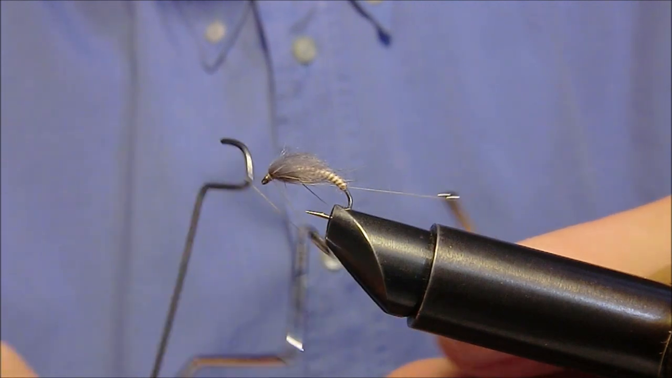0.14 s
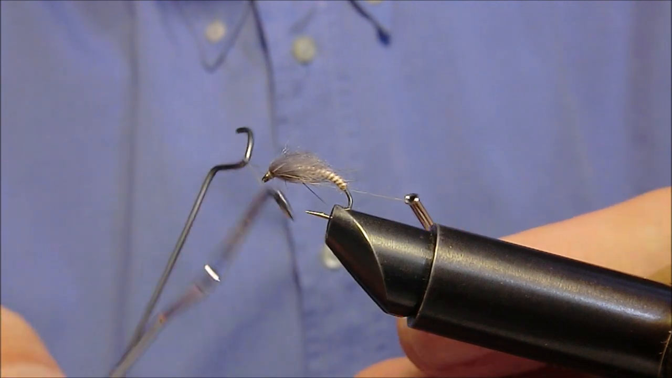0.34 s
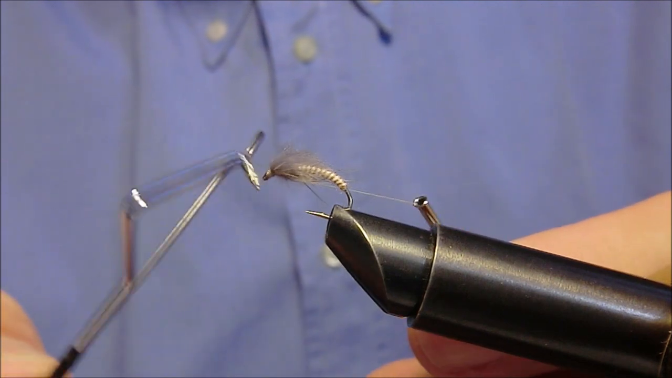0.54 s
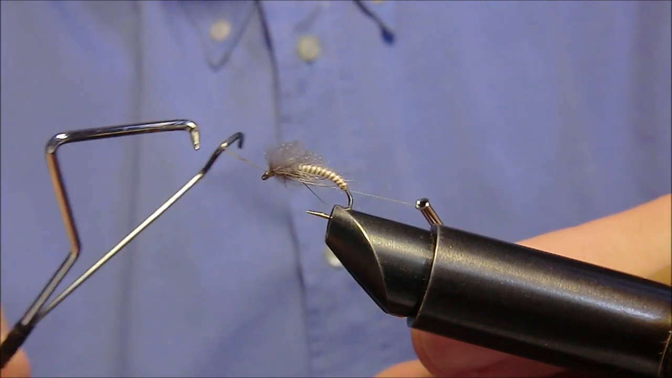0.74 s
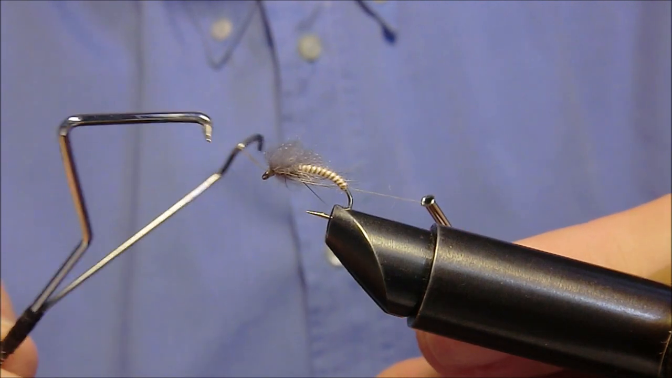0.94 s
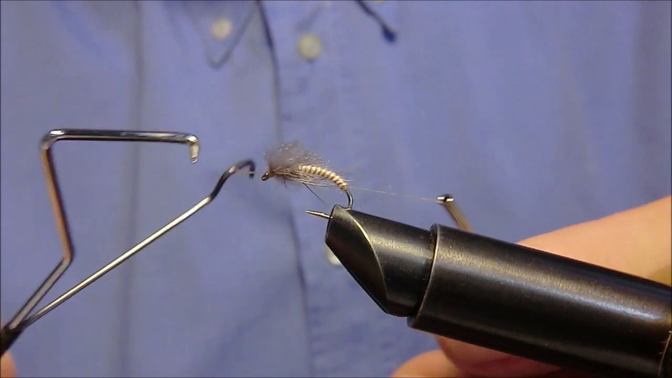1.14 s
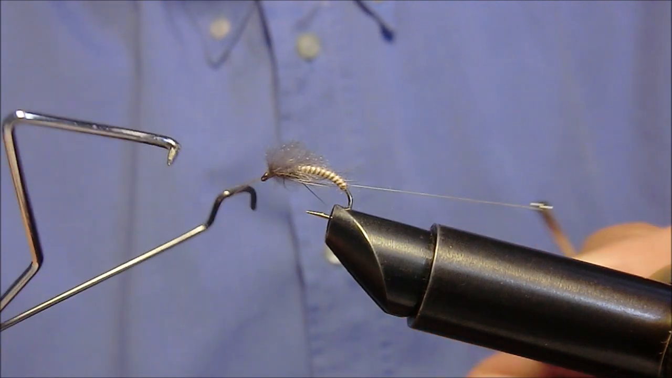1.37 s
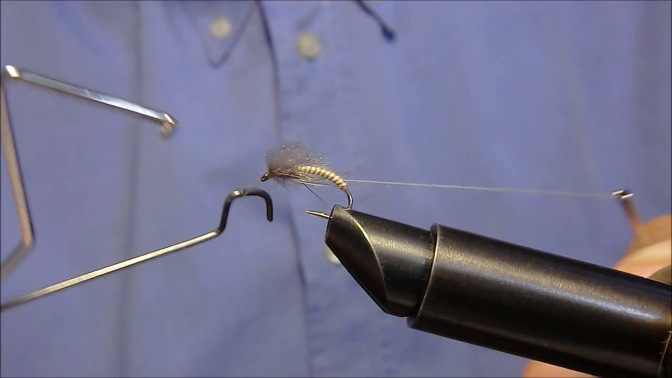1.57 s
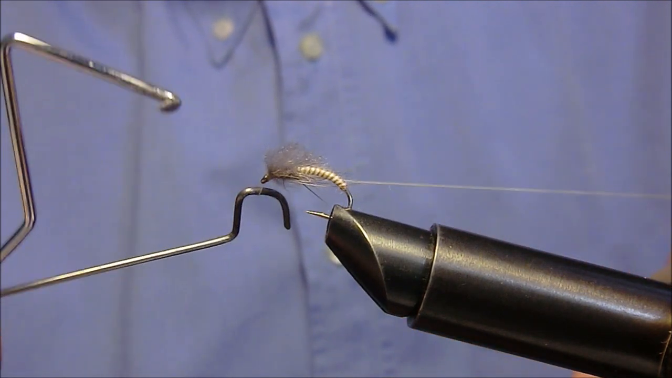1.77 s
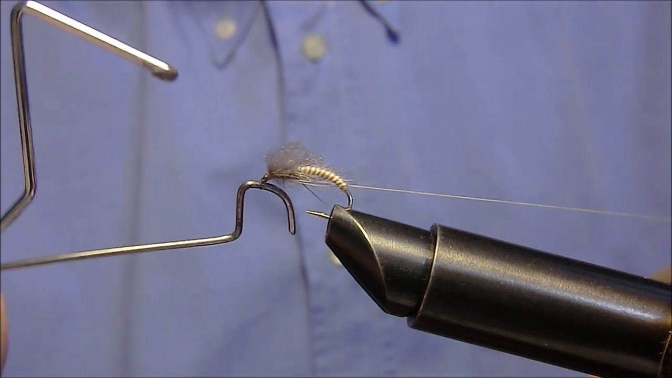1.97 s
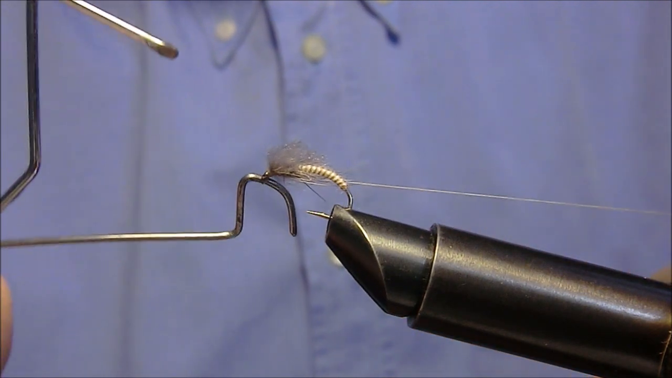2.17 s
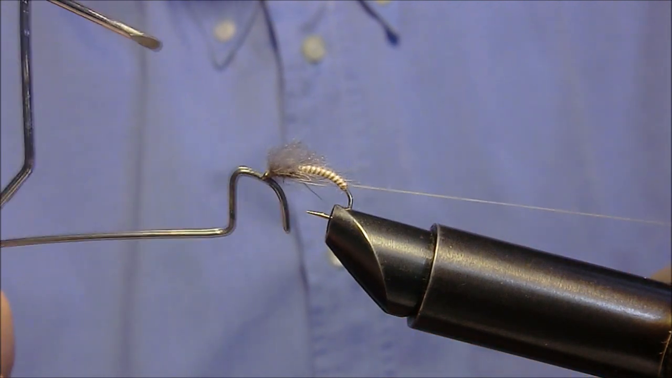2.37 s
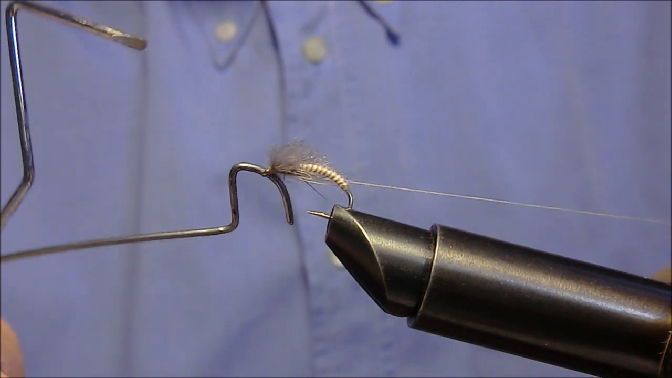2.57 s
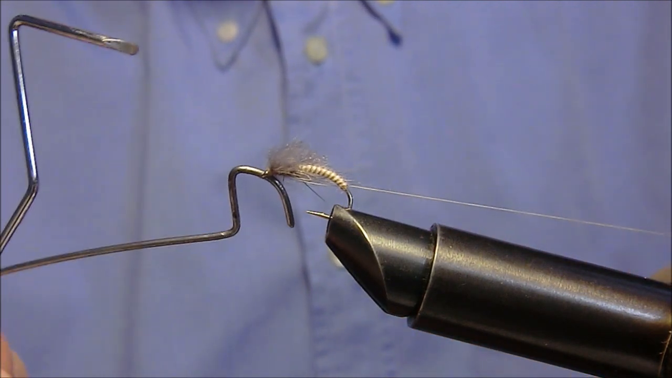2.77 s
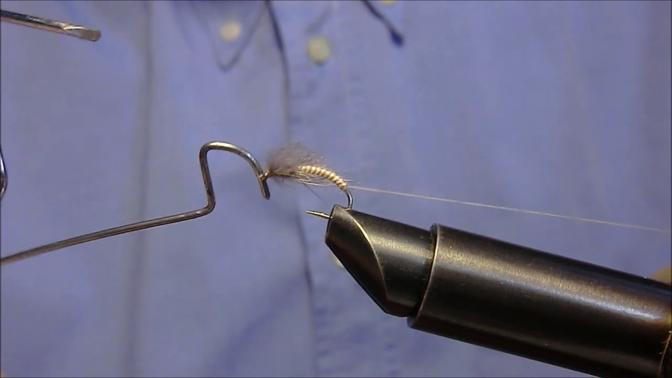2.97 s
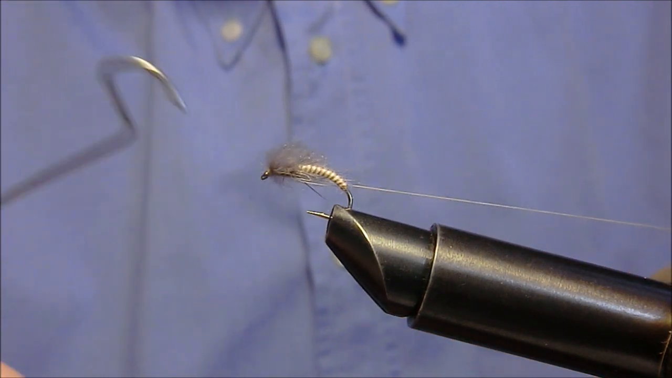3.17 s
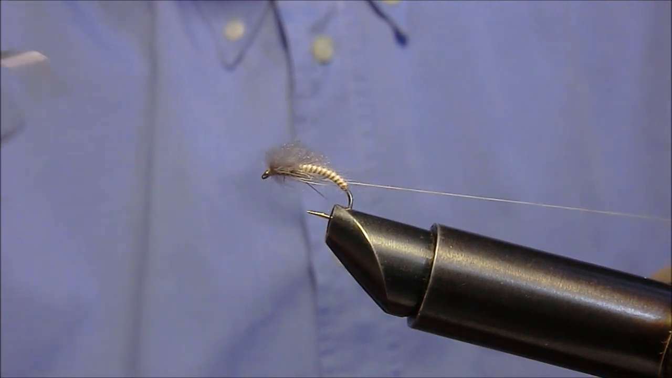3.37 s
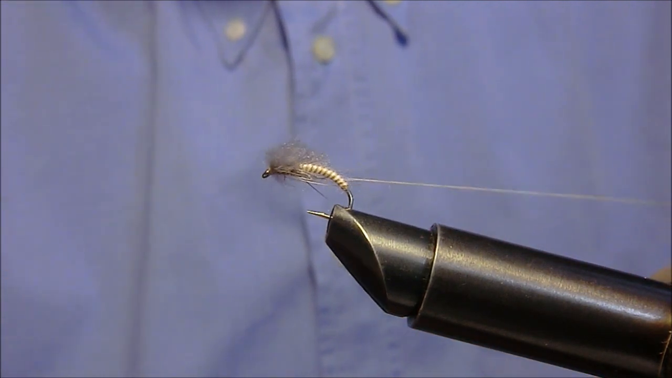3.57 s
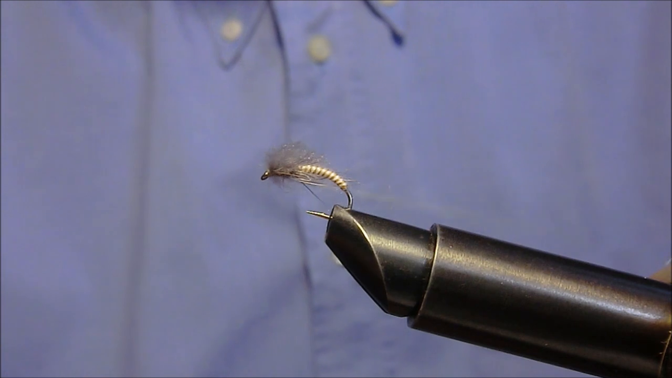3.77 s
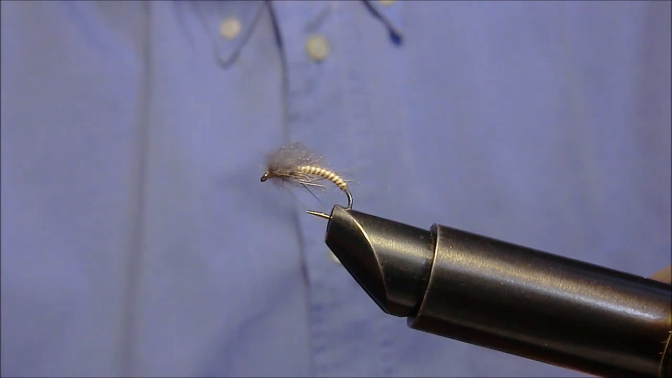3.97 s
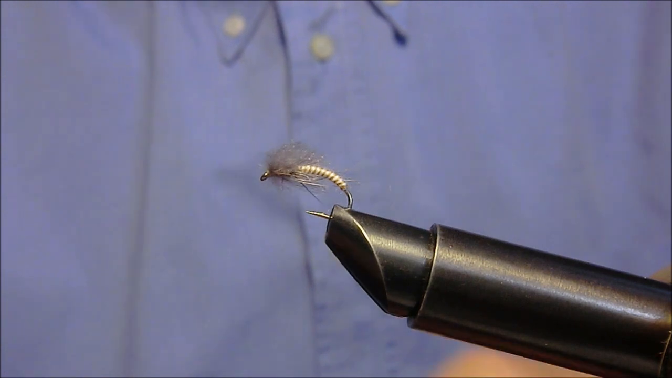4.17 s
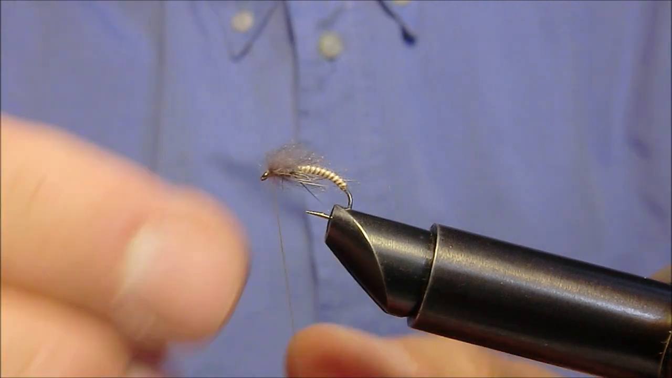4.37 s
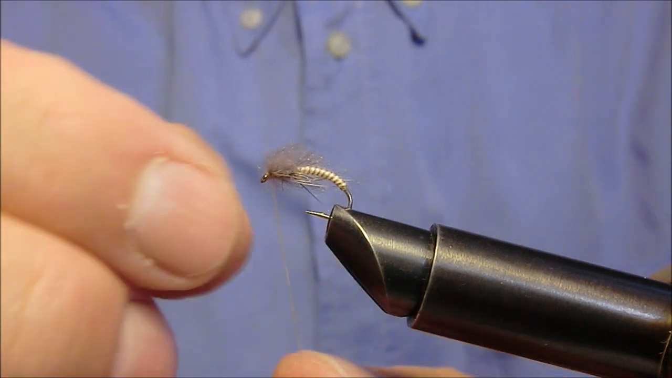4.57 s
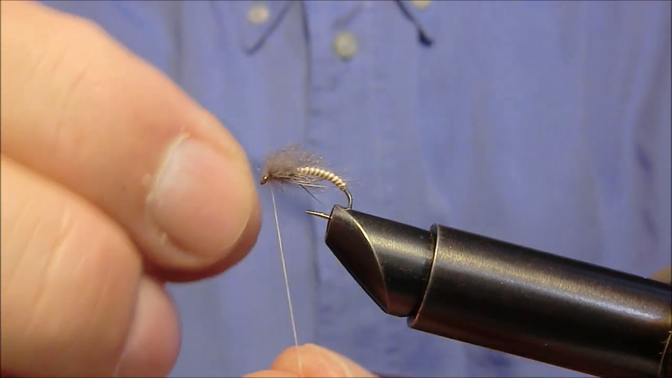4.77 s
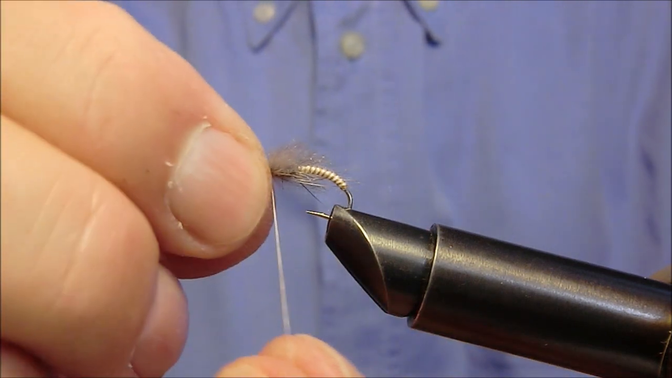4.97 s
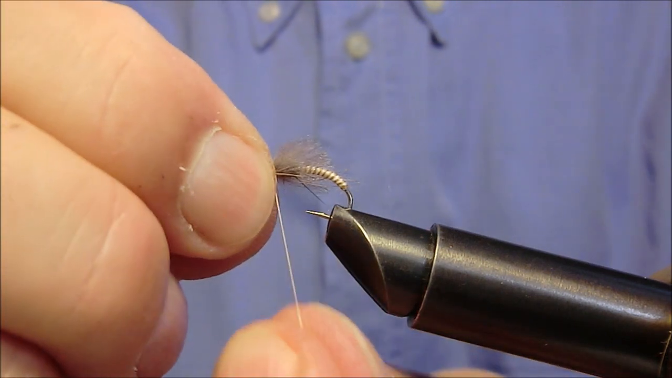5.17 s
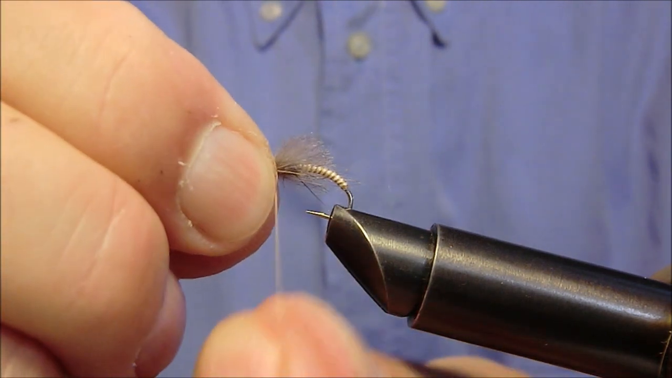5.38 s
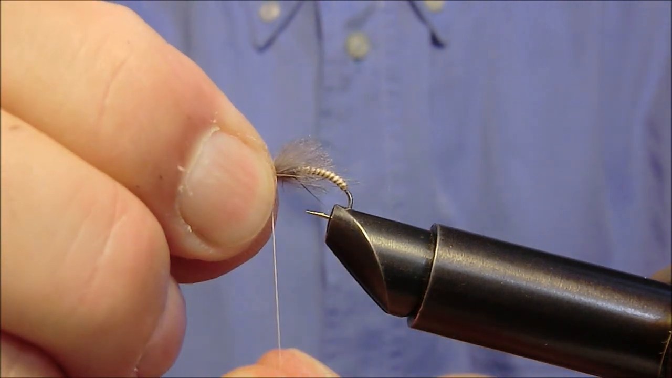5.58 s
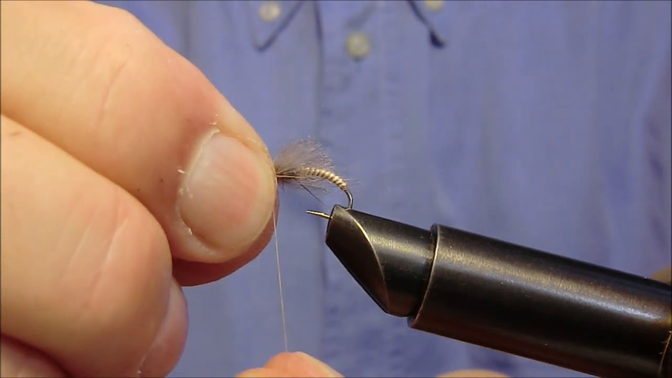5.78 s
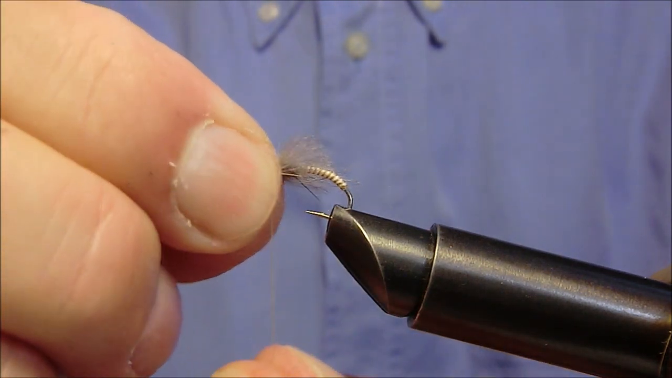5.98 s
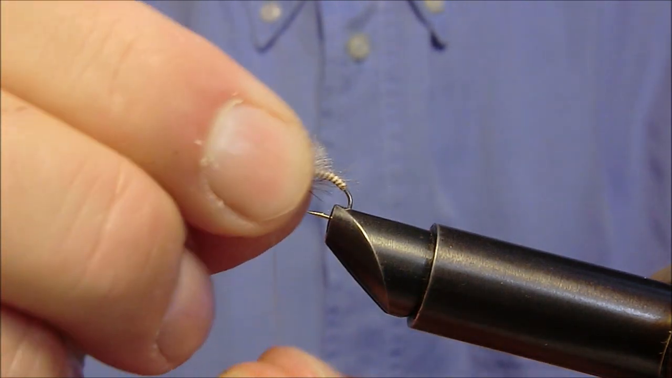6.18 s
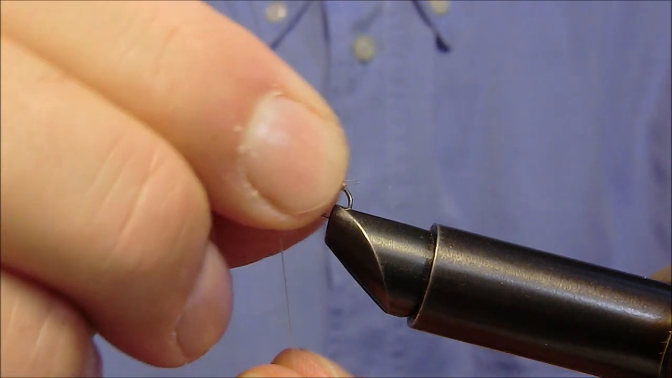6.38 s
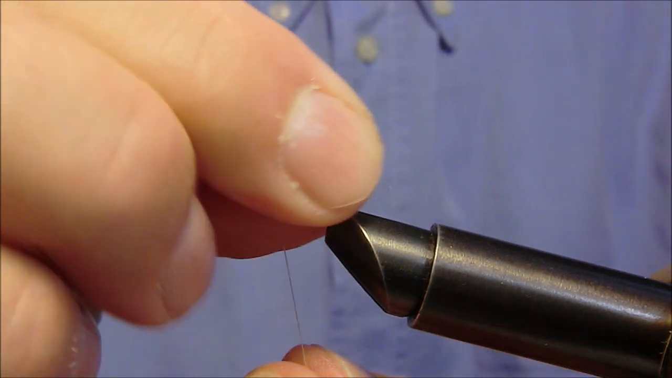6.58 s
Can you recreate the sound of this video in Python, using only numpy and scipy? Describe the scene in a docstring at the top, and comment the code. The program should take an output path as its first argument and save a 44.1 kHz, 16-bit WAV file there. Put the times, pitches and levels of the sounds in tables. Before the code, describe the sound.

A quiet small room with low rumble, soft hiss and a barely perceptible hum, heard by one close microphone, the same in both channels. At about 0.1 s a thin wire clicks lightly, followed near 0.2 s by a very faint wavering squeak of thread. At 0.62 s a steel tool clinks brightly, with a weaker touch just after and a slender ring. Another almost buried squeak comes at 1.75 s. Tiny contacts at the hook follow at 2.3 and 2.45 s, a clearer dry tap at 2.9 s and a faint pair near 3.2 s. At 3.99 s a small click leads into a very loud, hard scissor snip at 4.05 s, with a second bright clack at 4.12 s and a short room tail. The background drops, then creeps back over a couple of seconds, with faint ticks at 4.85 and 5.15 s; then only room noise until 6.7 s.

```python
"""Fly tying at a bench

In a small room a wire whip finisher clicks, clinks and slips off the hook in the vise; the bobbin
squeaks faintly as thread is drawn; scissors snip close to the microphone. Steel is noise cracks plus
decaying sine modes, the squeak an unsteady harmonic tone, the background filtered noise with two tones.
The snip makes the gain control duck, and the room hiss creeps back."""
import sys
import numpy as np
from scipy import signal
from scipy.fft import rfft, irfft, next_fast_len
from scipy.io import wavfile
from scipy.ndimage import uniform_filter1d, map_coordinates

SR = 44100
rng = np.random.default_rng(int(sys.argv[2]) if len(sys.argv) > 2 else 0)


def unload_audio(sound):
    """Save the sound as a 16-bit wav file, at the path given as the first command line argument."""
    columns = np.transpose(np.atleast_2d(sound))
    # keep every value between -1 and 1, then stretch to whole-number steps
    steps = np.round(np.clip(columns, -1, 1) * 32767)
    wavfile.write(sys.argv[1], SR, steps.astype(np.int16))


N = 292074  # samples


# scissor contacts: start_s, ring_db, crack_db
SCISSOR_HITS = [(3.9874, -34, -29.5), (4.0495, 6.5, 2), (4.0576, -27, -15), (4.0591, -6, 1),
                (4.0604, -3.5, -7), (4.0650, -1.5, -5.5), (4.0907, -25, -15), (4.1143, -36, -15.5),
                (4.1155, -6.5, -17), (4.1223, -5, -14.5)]
# blade modes: freq_hz, level_db, t60_s
SCISSOR_MODES = [(601, -37, 0.11), (700, -31.5, .06), (1118, -25, 0.032), (1900, -18.5, 0.018),
                 (2740, -18, 0.019), (5800, -17, 0.0084), (7320, -10, 0.0164), (7600, -5, 0.0093),
                 (8320, -10, 0.0085), (10920, -26, 0.017), (13600, -23.5, .006)]
# crack filter: freq_hz, gain_db
SCISSOR_CRACK = [(60, -19), (170, -6), (260, -14.5), (480, -9), (680, 4), (1300, -8.5), (2400, -2.5),
                 (3800, -3.5), (6000, -2), (8000, 4), (10000, -1.5), (14000, -15.5), (16000, -19)]


def scissors():
    """Blades strike and snip: hard cracks excite the short modes of the steel."""
    return steel(SCISSOR_HITS, SCISSOR_MODES, SCISSOR_CRACK, crack_t60_s=0.011, wet_db=-4.5)


# finisher contacts: start_s, ring_db, crack_db
FINISHER_HITS = [(.6170, -21.5, -14), (.6375, -32, -44), (.6522, -19, -31)]
# finisher modes: freq_hz, level_db, t60_s
FINISHER_MODES = [(725, -23, 0.033), (1760, -23, 0.017), (2525, -12, 0.06), (2660, -31, .14),
                  (3440, -12, 0.022), (4500, -15, 0.018), (5500, -8, 0.019), (6160, -10, 0.041),
                  (6270, -15, 0.021), (9500, -36, .07), (15200, -28, 0.057)]
# crack filter: freq_hz, gain_db
FINISHER_CRACK = [(120, -37), (200, 0), (1020, -12), (1680, 4.5), (2470, 5.5), (2910, 2), (6050, 1.5),
                  (11100, -15), (13600, -19), (15100, -25), (16000, -53)]


def finisher():
    """The whip finisher clinks: cracks plus the decaying modes of its steel."""
    return steel(FINISHER_HITS, FINISHER_MODES, FINISHER_CRACK, crack_t60_s=0.013, wet_db=-5.5)


# wire contacts: start_s, ring_db, crack_db
WIRE_HITS = [(.0575, -59, -37), (.0932, -43, -31), (.1059, -15.5, -17.5)]
# wire modes: freq_hz, level_db, t60_s
WIRE_MODES = [(737, -35.5, 0.39), (3000, -13.5, 0.023), (4900, -26, 0.0074), (5440, -24, .016),
              (8400, -5, 0.0058), (9280, -9, 0.0093), (13440, -13, 0.0038)]
# crack filter: freq_hz, gain_db
WIRE_CRACK = [(120, -45), (200, -7), (1910, -13.5), (2910, 0), (3900, -11), (4900, -3.5), (6170, -18),
              (8580, -5), (11500, -14), (13100, -6), (16000, -25)]


def wire():
    """The wire clicks: short high modes over one long low mode."""
    return steel(WIRE_HITS, WIRE_MODES, WIRE_CRACK, crack_t60_s=0.016, wet_db=-3.5)


# hook contacts: start_s, ring_db, crack_db
HOOK_HITS = [(2.3118, -50, -48), (2.4648, -31.5, -41.5), (2.8786, -23.5, -27.5), (3.1672, -58, -34.5),
             (3.1688, -31, -34), (3.2088, -46, -29.5), (3.2130, -33, -31.5)]
# hook modes: freq_hz, level_db, t60_s
HOOK_MODES = [(3720, -16.5, 0.012), (5380, -10.5, 0.0091), (5900, -12, 0.018), (7800, -22.5, 0.0065),
              (9580, -11.5, 0.019)]
# crack filter: freq_hz, gain_db
HOOK_CRACK = [(180, -35.5), (300, 0.5), (1010, -4), (1810, 1), (2480, -4), (5340, 7), (6520, 0),
              (9710, -6.5), (16000, -67)]


def hook():
    """Contacts at the hook: cracks plus high modes that die within 20 ms."""
    return steel(HOOK_HITS, HOOK_MODES, HOOK_CRACK, crack_t60_s=0.014, wet_db=-7.0)


def steel(hits, modes, crack_colour, crack_t60_s, wet_db):
    """Every contact cracks and sets the part's modes ringing; the crack carries further into the room."""
    rings, cracks = np.zeros(N), np.zeros(N)
    for start_s, ring_db, crack_db in hits:
        add(rings, start_s, amp(ring_db) * ring(modes))
        add(cracks, start_s, amp(crack_db) * crack(crack_t60_s))
    cracks = coloured(cracks, crack_colour)
    room_feed = cracks + 0.5 * rings
    return rings + cracks + amp(wet_db) * room(room_feed)


def ring(modes):
    """The modes of one blow, each at a slightly new strength."""
    t = np.arange(SR // 2) / SR
    out = np.zeros(len(t))
    for freq_hz, level_db, t60_s in modes:
        strength = amp(level_db + rng.uniform(-1.47, 1))
        out += strength * fade(t, t60_s) * np.sin(2 * np.pi * freq_hz * t)
    return out


def crack(t60_s):
    """The dense, quickly dying vibration of a hard contact: decaying noise of set energy."""
    envelope = fade(np.arange(SR // 20) / SR, t60_s)
    burst = envelope * rng.standard_normal(len(envelope))
    return burst * np.linalg.norm(envelope) / np.linalg.norm(burst)


# long thin rings after a clink or snip: start_s, freq_hz, level_db, t60_s
LONG_RINGS = [(.617, 2474, -33.5, 0.35), (.617, 2990, -48, 0.26), (0.652, 6080, -49, .3),
              (.6522, 6270, -46, 0.3), (3.212, 5440, -53, 0.22), (3.213, 5530, -49, 0.18),
              (4.1155, 10900, -35, 0.2), (4.1155, 12800, -43, .17)]


def long_rings():
    """Single high tones that ring on after the contacts."""
    out = np.zeros(N)
    for start_s, freq_hz, level_db, t60_s in LONG_RINGS:
        add(out, start_s, ring([(freq_hz, level_db, t60_s)]))
    return out


# knocks reaching the vise stem: start_s, level_db
VISE_KNOCKS = [(.106, -46.5), (0.616, -45.5), (2.881, -37), (3.214, -48.5), (4.06, -43)]
# stem modes: freq_hz, level_db, t60_s
VISE_MODES = [(91, -3.5, 0.23), (168, -19, 0.17), (282.5, -4, 0.27), (342, -9.5, 0.17), (747, -8.5, 0.091),
              (898, -14, 0.062)]


def vise():
    """The heavy stem hums briefly after a knock."""
    out = np.zeros(N)
    for start_s, level_db in VISE_KNOCKS:
        add(out, start_s, amp(level_db) * ring(VISE_MODES))
    return out


# dull bumps of the hand working the scissors: start_s, level_db
BUMPS = [(3.9877, -32), (4.1205, -45)]
BUMP_HZ, BUMP_T60_S = 200, 0.017


def bumps():
    """A soft, low push that dies within a few cycles."""
    out = np.zeros(N)
    for start_s, level_db in BUMPS:
        add(out, start_s, ring([(BUMP_HZ, level_db, BUMP_T60_S)]))
    return out


# light ticks of thread and fingernail: start_s, level_db, pitch_hz
TICKS = [(4.8417, -48.5, 4140), (5.14, -41, 2930)]
# crack filter: freq_hz, gain_db
TICK_COLOUR = [(300, -12.5), (1500, 4), (3500, 9), (5000, -8), (15000, -18)]
TICK_T60_S, TICK_TONE_DB = 0.0075, 1  # tone level is relative to the table's


def ticks():
    """Soft contacts: a tiny crack plus a pitch, both dying within milliseconds."""
    cracks, tones = np.zeros(N), np.zeros(N)
    for start_s, level_db, pitch_hz in TICKS:
        add(cracks, start_s, amp(level_db) * crack(TICK_T60_S))
        add(tones, start_s, ring([(pitch_hz, level_db + TICK_TONE_DB, TICK_T60_S)]))
    return coloured(cracks, TICK_COLOUR) + tones


# squeaks, one per pull of thread: start_s, length_s, top_pitch_hz, level_db, overtone_lift_db
SQUEAKS = [(0.188, 0.182, 638.6, -55, 1), (1.736, .18, 588, -60, 6.5)]
# overtones re fundamental, before the lift: multiple, level_db
OVERTONES = [(2, -18), (3, -9), (4, -21)]
SQUEAK_ATTACK_S, SQUEAK_RELEASE_S = 0.037, 0.059
SQUEAK_SAG = 0.07  # share by which pitch lies lower at both ends of a pull


def bobbin(jitter, flutter_db):
    """The spool sticks and slips between its arms: an unsteady harmonic tone, highest in mid-pull."""
    out = np.zeros(N)
    for start_s, length_s, top_hz, level_db, lift_db in SQUEAKS:
        t = np.arange(N) / SR - start_s
        attack = t / SQUEAK_ATTACK_S
        release = (length_s - t) / SQUEAK_RELEASE_S
        envelope = np.clip(np.minimum(attack, release), 0, 1)
        speed = np.sin(np.pi * np.clip(t / length_s, 0, 1))
        pitch_hz = top_hz * (1 - SQUEAK_SAG * (1 - speed))
        phase = 2 * np.pi * np.cumsum(pitch_hz * (1 + jitter * wobble(250))) / SR
        overtones = sum(amp(db) * np.sin(round(k) * phase) for k, db in OVERTONES)
        tone = unit(np.sin(phase) + amp(lift_db) * overtones)
        out += tone * envelope * amp(level_db + flutter_db * wobble(60.1))
    return out


# noise filter, relative: freq_hz, gain_db
HISS = [(12, -39.5), (20, -7), (77, -1), (134, -2), (234, -4), (399, -7.5), (434, -8.5), (542, -9.5),
        (1090, -14.5), (1760, -17), (2460, -19), (2820, -19), (5680, -22.5), (13500, -23.5), (16000, -24.5)]
HISS_RMS_DB = -54
# steady hum and whine: freq_hz, rms_db
HUM = [(81, -70.5), (7806, -80)]


def background():
    """Room rumble and microphone hiss as filtered noise, with a faint phase-drifting hum and whine."""
    t = np.arange(N) / SR
    hiss = unit(coloured(rng.standard_normal(N), HISS))
    hum = sum(amp(db) * unit(np.sin(2 * np.pi * hz * t + wobble(3.2))) for hz, db in HUM)
    return amp(HISS_RMS_DB) * hiss + hum


# reverberation time: freq_hz, t60_s
ROOM_T60 = [(150, 0.94), (1000, 0.46), (3000, 0.51), (8000, 0.42), (15000, 0.33)]
# room filter: freq_hz, gain_db
ROOM_SEND = [(150, 0), (700, 5), (2500, 2), (7500, -4.5), (11000, -12.5), (15000, -4)]


def room(x):
    """A dense noise tail that starts at once in so small a room; its treble dies first."""
    hz, t, bins = signal.stft(rng.standard_normal(SR), SR, nperseg=256)
    decay = fade(t, along(ROOM_T60, hz)[:, None])
    tail = signal.istft(bins * decay, SR, nperseg=256)[1]
    tail /= np.linalg.norm(tail)
    return coloured(signal.fftconvolve(x, tail)[:N], ROOM_SEND)


def placed(x, wet_db):
    """A source with its share of the room."""
    return x + amp(wet_db) * room(x)


def amp(db):
    """Decibels to gain."""
    return 10 ** (np.asarray(db) / 20)


def unit(x):
    """x at rms 1."""
    return x / np.sqrt(np.mean(x ** 2) + 1e-20)


def along(points, hz):
    """(freq_hz, value) points read on a log frequency axis."""
    f, v = np.transpose(points)
    return np.interp(np.log(hz + 1), np.log(f + 1), v)


def fade(t, t60_s):
    """Exponential decay, 60 dB down at t60_s."""
    return np.exp(-np.log(1000) * t / t60_s)


def wobble(rate_hz):
    """A smooth random curve, rate_hz knots a second."""
    knots = rng.standard_normal(int(N * rate_hz / SR) + 4)
    return map_coordinates(knots, [np.arange(N) * rate_hz / SR])


def add(track, start_s, sound):
    """Mix a sound into the track from start_s on."""
    part = track[round(start_s * SR):][:len(sound)]
    part += sound[:len(part)]


def coloured(x, spectrum):
    """x through the causal minimum-phase filter with these (freq_hz, gain_db) points."""
    m = next_fast_len(SR // 2)
    gain = amp(along(spectrum, np.fft.rfftfreq(m, 1 / SR)))
    cepstrum = irfft(np.log(gain), m)
    # fold onto positive time: minimum phase
    cepstrum[1:m // 2] *= 2
    cepstrum[m // 2 + 1:] = 0
    impulse = irfft(np.exp(rfft(cepstrum)), m)
    return signal.fftconvolve(x, impulse)[:N]


def scene():
    """All sources reach one microphone, which feeds both channels."""
    tools = scissors() + finisher() + wire() + hook()
    small = placed(long_rings() + vise() + bumps() + ticks(), wet_db=-8.5)
    squeaks = placed(bobbin(jitter=0.054, flutter_db=3.0), wet_db=-6)
    mono = tools + small + squeaks + background()
    return np.array([mono, mono])


def gain_control(x, limit_db=-8.5, release_db_per_s=4.0):
    """Gain drops at once when the level passes the limit, then recovers at a steady dB rate."""
    power = np.abs(uniform_filter1d(x[0] ** 2, size=44))  # 1 ms mean
    excess_db = np.maximum(10 * np.log10(power + 1e-12) - limit_db, 0)
    recovery_db = release_db_per_s * np.arange(N) / SR
    gain_db = recovery_db - np.maximum.accumulate(excess_db + recovery_db)
    return x * amp(gain_db)


def soft_clip(x, ceiling=0.62):
    """Rounds off the very highest peaks towards the ceiling."""
    return x / (1 + (x / ceiling) ** 6) ** (1 / 6)


def record(dry, top_hz=15900):
    """Gain control and peak rounding, then the recorder's band limit."""
    m = next_fast_len(N + SR // 2)
    spectrum = rfft(soft_clip(gain_control(dry)), m)
    passband = np.fft.rfftfreq(m, 1 / SR) < top_hz
    return irfft(spectrum * passband, m)[:, :N]


dry = scene()
out = record(dry)
unload_audio(out)
```